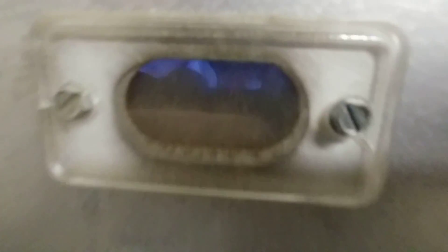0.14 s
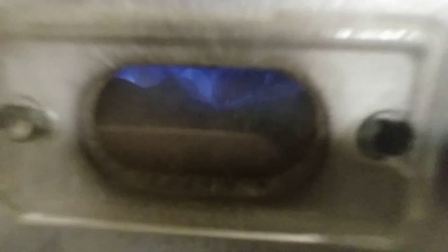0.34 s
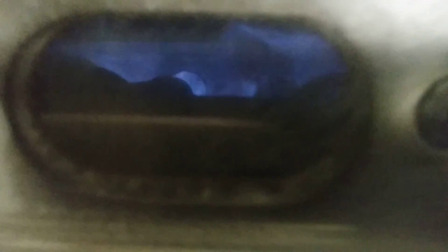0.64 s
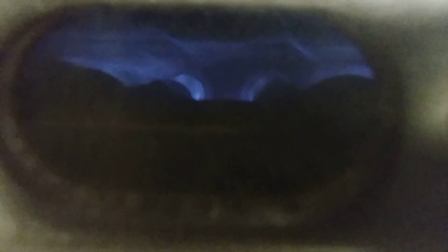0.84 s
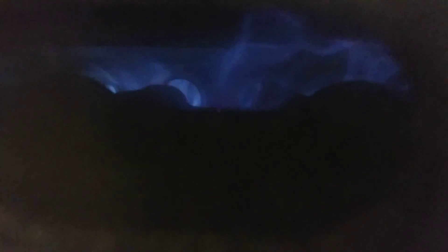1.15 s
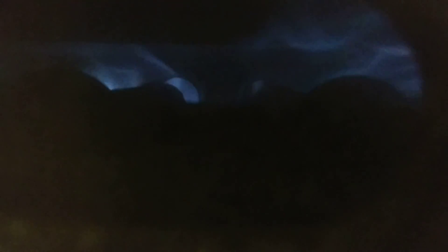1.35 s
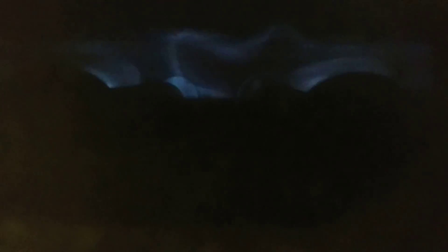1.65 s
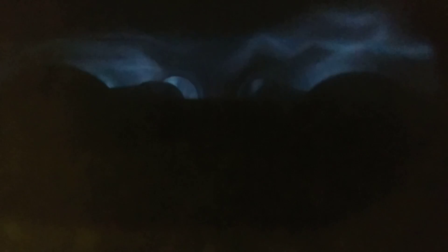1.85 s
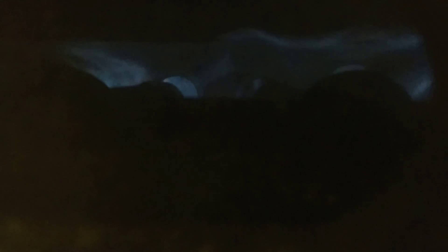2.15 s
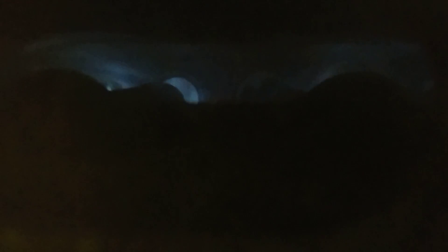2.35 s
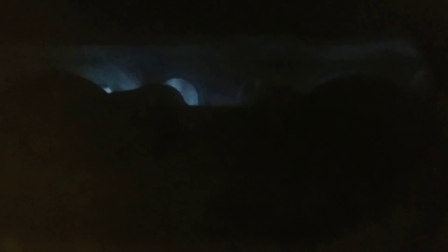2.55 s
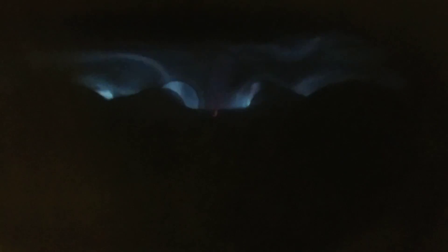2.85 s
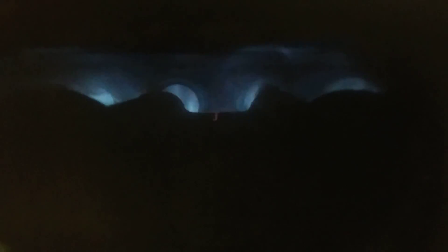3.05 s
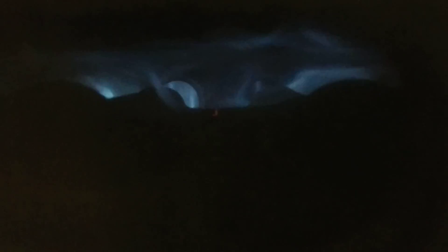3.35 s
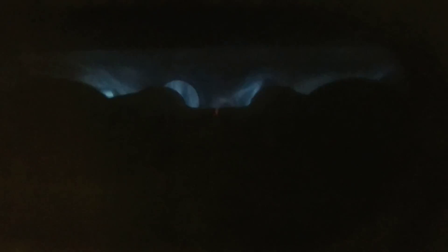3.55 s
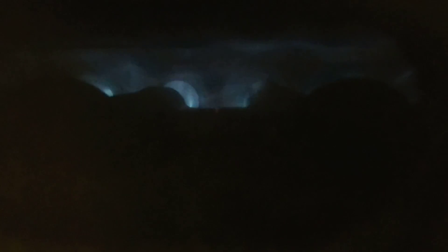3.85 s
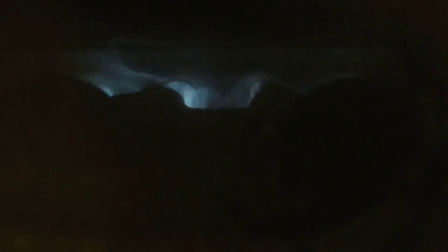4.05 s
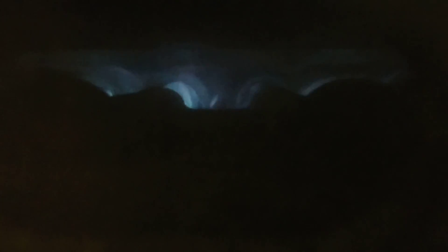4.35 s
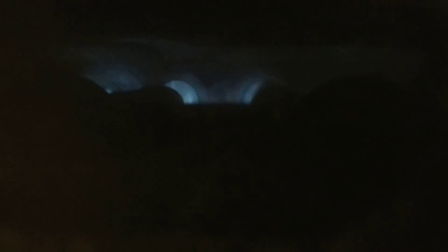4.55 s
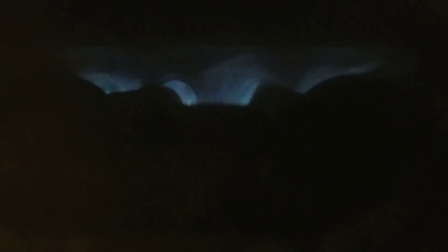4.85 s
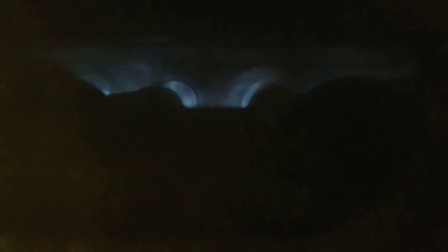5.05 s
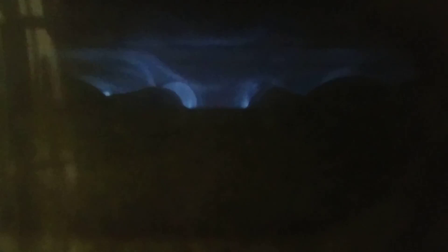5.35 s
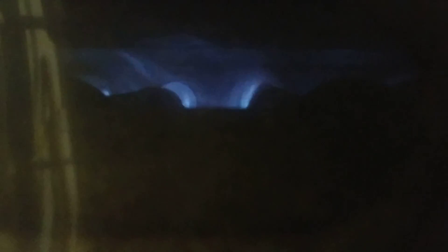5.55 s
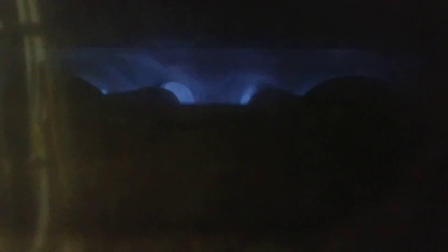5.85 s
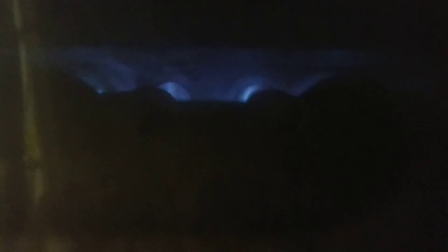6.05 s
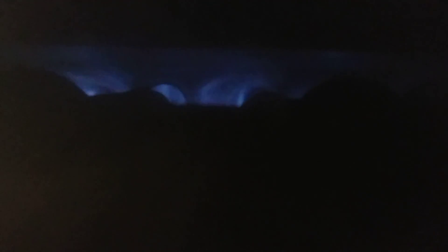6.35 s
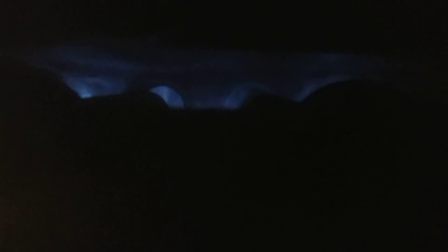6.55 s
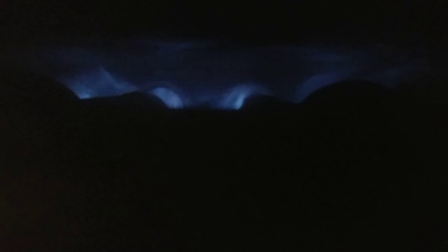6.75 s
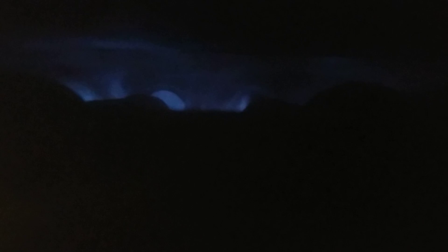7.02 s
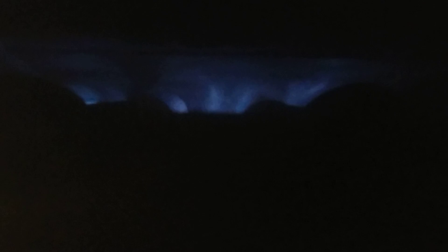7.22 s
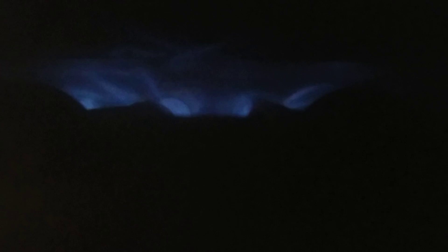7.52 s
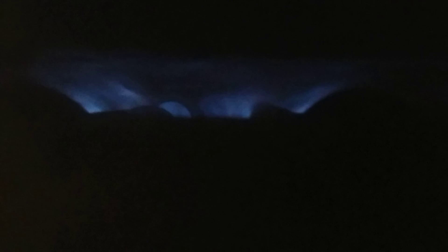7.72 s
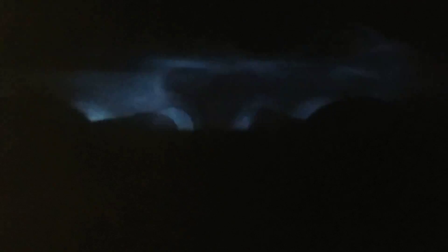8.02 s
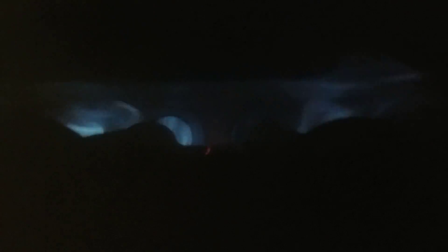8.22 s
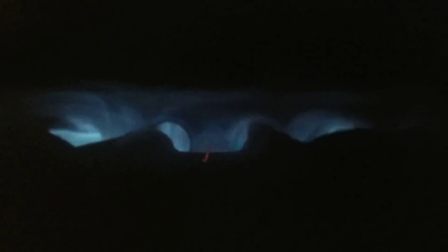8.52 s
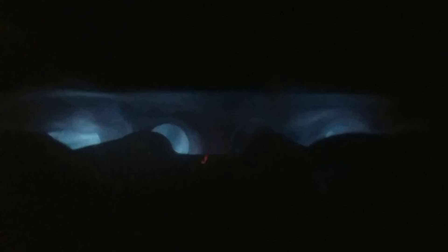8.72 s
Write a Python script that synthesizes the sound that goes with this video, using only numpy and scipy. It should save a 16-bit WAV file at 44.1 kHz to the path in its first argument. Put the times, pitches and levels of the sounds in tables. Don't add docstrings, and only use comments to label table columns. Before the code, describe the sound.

A gas furnace roars close up in booming, fluttering waves, while a draft blower whines steadily at mid pitch over a low motor hum.

```python
import sys
import numpy as np
from scipy import signal
from scipy.io import wavfile
from scipy.ndimage import uniform_filter1d, minimum_filter1d

SR = 44100
rng = np.random.default_rng(int(sys.argv[2]) if len(sys.argv) > 2 else 0)


def bounce(signal):
    frames = np.transpose(np.atleast_2d(signal))
    limited = np.clip(frames, -1, 1)
    pcm = np.round(limited * 32767).astype(np.int16)
    wavfile.write(sys.argv[1], SR, pcm)


def gain_from_db(level_db):
    decades = np.asarray(level_db, float) / 20
    return 10 ** decades


N = 391608


def evened(x):
    return x / np.sqrt(np.mean(x ** 2) + 1e-20)


def over_hz(points, hz):
    f, *columns = np.transpose(points)
    return [np.interp(np.log(hz + 1), np.log(f + 1), column)[:, None] for column in columns]


def bump(hz, centre_hz, octaves):
    return np.exp(-(np.log2((hz + 1) / centre_hz) / octaves) ** 4)


def step(t, middle_s, length_s):
    return .5 + .5 * np.tanh(2 * (t - middle_s) / length_s)


def swells(rows, rise_s, t):
    peak_s, db, fall_s = np.transpose(rows)[..., None]
    side_s = np.where(t < peak_s, rise_s, fall_s)
    return (db * np.exp(-((t - peak_s) / side_s) ** 2)).sum(0)


# middle_s, length_s, left_1100hz_db, left_2300hz_db, right_1800hz_db
HAND_MOVES = [
    (0.664, 0.76, 6, 1.5, 2.5),
    (5.563, .5, -4, -6.5, 0),
]
# left_1100hz_db, left_2300hz_db, right_1800hz_db
OPENING_DB = (-5, -0.5, -4)


def port_lean_db(hz, t):
    moved = sum(np.outer(db, step(t, middle_s, length_s)) for middle_s, length_s, *db in HAND_MOVES)
    low, mid, right_mid = np.array(OPENING_DB)[:, None] + moved
    glint = 4.5 * (1 - step(t, 1.27, .4))
    left = low * bump(hz, 1100, 0.68) + mid * bump(hz, 2300, 0.53) + glint * bump(hz, 3500, 0.41)
    return np.array([left, right_mid * bump(hz, 1800, .9)])


# peak_s, strength_db, fall_s
FIREBOX_SWELLS = [(0, 9, .3), (1.1, 9, .12), (1.451, 5.5, .3), (2.05, 7, .25), (2.55, 11, .1),
                  (3.05, 6.5, .1), (3.4, 5.5, .9), (4.97, -9.5, .15), (5.6, 5, .08), (5.99, 9.5, .25),
                  (6.55, 5.5, .1), (7.54, 10, .3), (8.06, 6.5, .4), (8.7, 8.5, .4)]
# peak_s, strength_db, fall_s
FLUE_SWELLS = [(.39, 0, .12), (.81, 4, .05), (.99, 8, 0.072), (1.411, 6, .4), (2.1, 2, 0.55),
               (3.05, 10, .1), (3.3, 5, .9), (4.23, 6.5, .2), (4.72, 4, 0.17), (5.07, 12, 0.36),
               (5.86, 5, .15), (6.28, 9.5, 0.14), (6.6, 12, .3), (7.0, -2.5, 0.36), (7.7, 2, .25),
               (8.26, 7.5, 0.6), (8.749, 5, 0.43)]


def swell_booms(z, hz, t):
    booms = [(FIREBOX_SWELLS, 68, .45), (FLUE_SWELLS, 131, .4)]  # swells, centre Hz, octaves
    for boom_swells, centre_hz, octaves in booms:
        db = swells(boom_swells, .1, t)
        share = bump(hz, centre_hz, octaves)[:, None]
        power = (share * abs(z) ** 2).sum((0, 1))
        own_db = 10 * np.log10(uniform_filter1d(power, size=7))
        z = z * gain_from_db(.6 * share * (db - db.mean() - own_db + own_db.mean()))
    return z


# pitch_hz, width_hz, left_db_per_hz, left_minus_right_db
CABINET = [(71, 16, -32, 4), (104, 25, -36, 4), (133, 14, -28, 9), (150, 18, -35, 8), (187, 12, -37, 5),
           (228, 30, -43, 4), (308, 30, -46, 5), (355, 12, -43, 4), (372, 25, -45, 4), (432, 15, -52, 3),
           (635, 18, -43, 6), (665, 24, -45, 6), (700, 10, -41, 9), (770, 30, -51, 2), (855, 45, -47, 5),
           (1000, 40, -50, 6), (1045, 20, -50, 5), (1085, 25, -51, 6), (1190, 20, -47, 6),
           (1228, 35, -47, 8), (1345, 45, -48, 7), (1455, 25, -54, 4), (1670, 50, -55, 2)]


def cabinet_ring(hz, ring, other):
    f, width, db, pan_db = np.transpose(CABINET)
    shape = 1 / (1 + (1.3 * (hz[:, None] - f) / width) ** 2)
    modes = np.sqrt([shape ** 2 @ gain_from_db(2 * db), shape ** 2 @ gain_from_db(2 * (db - pan_db))])[..., None]
    alike = .96
    right = alike * ring + np.sqrt(1 - alike ** 2) * 1j * other
    return gain_from_db(-.7) * modes * [ring, right]


# pitch_hz, left_db_per_hz, right_db_per_hz, port_likeness (0-1)
RUSH = [(60, -46, -48, 0.85), (94, -43, -48.5, 0.15), (170, -46, -49.5, 0.73), (264, -53.5, -57.5, 0.48),
        (546, -56.5, -58, 0.29), (950, -56.5, -58, 0.23), (1610, -56.5, -57, 0.33), (2510, -62, -68, 0.067),
        (4330, -81.5, -81, 0.27), (6070, -85.5, -83.5, .1), (7590, -88.5, -93, .1), (8800, -100, -108, .1),
        (10100, -118, -120, .1), (14100, -105.5, -111.5, .1)]


def air_rush(hz, left, other):
    left_db, right_db, same = over_hz(RUSH, hz)
    return gain_from_db([left_db, right_db]) * [left, same * left + np.sqrt(1 - same ** 2) * other]


# peak_s, strength_db, fall_s
RUSTLES = [
    (.85, 2.5, .5),
    (1.33, 6, .04),
    (1.49, 6, 0.11),
]


def hand_hiss_db(hz, t):
    dimmed = -2 * step(t, *HAND_MOVES[1][:2])
    return bump(hz, 9700, 1.3)[:, None] * (swells(RUSTLES, 0.05, t) + dimmed)


# pitch_hz, lead_rad
PORT_LEAD = [(30, -.3), (100, 0), (150, .2), (700, .2), (900, .7), (1000, 1.6), (1120, .5), (1220, -2.2),
             (1330, -4.6), (1600, -3.3), (2000, -3), (2600, 0), (3700, 3.5), (4600, 7)]


def roar():
    size, hop = 4096, 1024
    frames, hz = N // hop + 6, np.fft.rfftfreq(size, 1 / SR)
    t = np.arange(frames) * hop / SR
    noise = rng.standard_normal((frames, len(hz), 7)).T
    ring, left, other = noise[:3] + 1j * noise[3:6]
    z = cabinet_ring(hz, ring, other) + air_rush(hz, left, other)
    z[1] *= np.exp(-1j * over_hz(PORT_LEAD, hz)[0])
    z *= gain_from_db(port_lean_db(hz[:, None], t))
    patches = uniform_filter1d(uniform_filter1d(noise[6], size=40, axis=0), size=4, axis=1)
    z *= gain_from_db(0.65 * evened(patches) + hand_hiss_db(hz, t))
    z = swell_booms(z, hz, t)
    white = signal.istft(ring, nperseg=size, noverlap=size - hop)[1].std()
    sound = signal.istft(z, nperseg=size, noverlap=size - hop)[1][:, :N]
    return sound * np.sqrt(SR / 2) / white


HUM_HZ = 120.03
# time_s, shaft_turns_per_s
SHAFT = [(0, 55.574), (8.88, 55.546)]
# shaft_order, hum_multiple, left_rms_db, left_minus_right_db, left_lead_rad
TONES = [(0, 1, -30, 4, 0), (0, 3, -44, 2, 0), (0, 5, -38, 7, 0), (11, 0, -21, 7, .1), (18, -1, -41, 6, .6),
         (16, 0, -49, 5, .6), (19, -1, -46, 8, .8), (17, 0, -49, 3, 1), (18, 0, -32, 14, 1.5),
         (19, 0, -48, -1, 1), (18, 1, -36, 6, .5), (19, 1, -39, 3, -.5), (22, 0, -31, 6, -2.3),
         (18, 2, -39, 2, -2.2), (33, 0, -52, 4, -2)]


def blower():
    t = np.arange(N) / SR
    turns = np.cumsum(np.interp(t, *np.transpose(SHAFT))) / SR
    knots = np.linspace(0, N / SR, num=40)
    chance = rng.standard_normal((len(TONES), 41))
    out = np.zeros((2, N))
    for (order, multiple, db, pan_db, lead), (start, *waver) in zip(TONES, chance):
        cycles = round(order) * turns + round(multiple) * HUM_HZ * t
        angle = 2 * np.pi * cycles + np.pi * start
        pitch_hz = order * SHAFT[0][1] + multiple * HUM_HZ
        left_db, right_db = (np.interp(t, knots, d) for d in port_lean_db(pitch_hz, knots))
        waver_db = 1.48 + 0.54 * (db < -25)
        size = np.sqrt(2) * gain_from_db(db + waver_db * np.interp(t, knots, waver))
        left = gain_from_db(left_db) * np.cos(angle)
        right = gain_from_db(right_db - pan_db) * np.cos(angle - lead)
        out += size * [left, right]
    return out


def scene():
    return roar() + blower()


def low_pass(x):
    return signal.sosfilt(signal.butter(12, 15790, fs=SR, output="sos"), x)


def record(dry):
    low_cut = signal.butter(6, 55, "high", fs=SR, output="sos")
    heard = signal.sosfilt(low_cut, dry)
    room = minimum_filter1d(np.minimum(1, .97 / (abs(heard) + 1e-9)), size=1201)
    eased = heard * uniform_filter1d(uniform_filter1d(room, size=600), size=600)
    eased = eased * np.clip(np.arange(N)[::-1] / 10, 0, 1)
    return low_pass(eased)


dry = scene()
out = record(dry)
bounce(out)
```